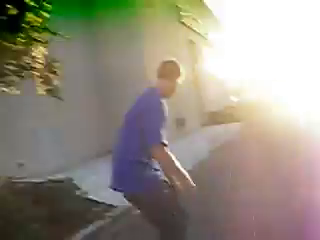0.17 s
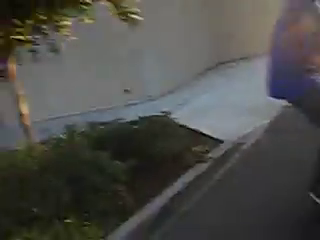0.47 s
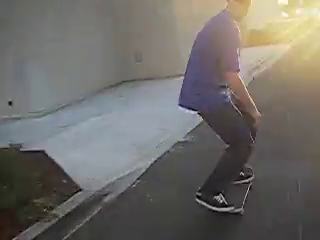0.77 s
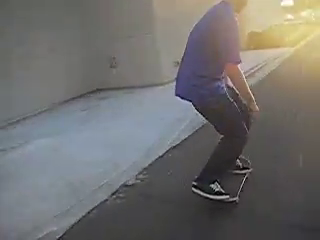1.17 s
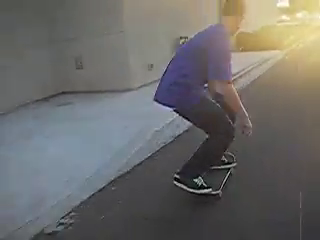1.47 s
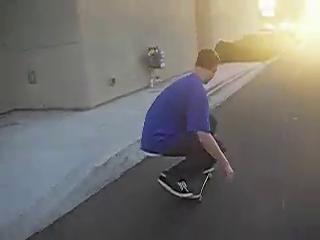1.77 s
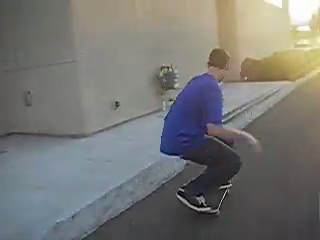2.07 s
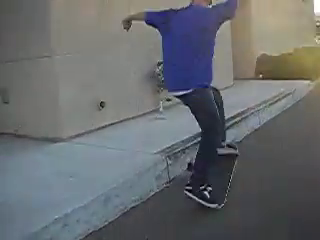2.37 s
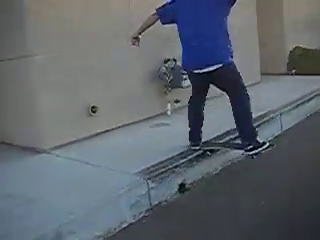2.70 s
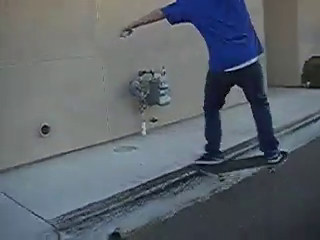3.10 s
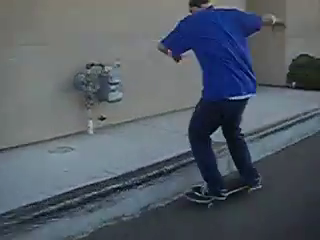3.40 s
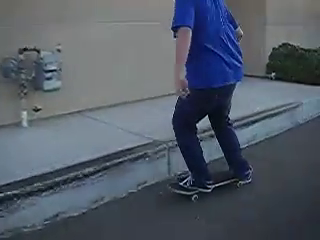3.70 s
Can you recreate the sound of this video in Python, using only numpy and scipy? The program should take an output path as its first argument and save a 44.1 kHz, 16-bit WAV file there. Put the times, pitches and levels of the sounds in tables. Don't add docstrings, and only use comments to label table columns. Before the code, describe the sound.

Skateboard wheels start with uneven metallic clatter, settle into a steady woody rumble, then a pop, a hard metal knock on stone and a landing thud; faint street noise, narrow, distorted small camera sound.

```python
import sys
import numpy as np
from scipy import signal
from scipy.fft import rfft, irfft
from scipy.io import wavfile

SR = 44100
rng = np.random.default_rng(int(sys.argv[2]) if len(sys.argv) > 2 else 0)


def magnitude_from_level(level_db):
    exponent = np.asarray(level_db, float) / 20
    return 10 ** exponent


def store_wav(level_fs):
    pcm = np.round(np.clip(np.atleast_2d(level_fs), -1, 1) * 32767)
    wavfile.write(sys.argv[1], SR, pcm.T.astype(np.int16))


N = 169785


def rms_one(x):
    return x / np.sqrt(np.mean(x ** 2) + 1e-20)


def drift(rate_hz):
    settle = 8000
    r = np.exp(-2 * np.pi * rate_hz / SR)
    wander = signal.lfilter([1], [1, -2 * r, r * r], rng.standard_normal(N + settle))
    return rms_one(wander[settle:])


def resonate(x, hz, width_hz):
    r = np.exp(-np.pi * width_hz / SR)
    gain = (1 - r * r) / 2
    return signal.lfilter([gain, 0, -gain], [1, -2 * r * np.cos(2 * np.pi * hz / SR), r * r], x)


def add(out, start_s, x):
    i = int(start_s * SR)
    out[i:i + len(x)] += x[:N - i]


def grit():
    grains_per_s, spread_db = 900, 3.5
    sizes = magnitude_from_level(spread_db * np.minimum(rng.exponential(1, N), 4)) * rng.choice([-1, 1], N)
    return rms_one(sizes * (rng.random(N) < grains_per_s / SR))


def body(modes, shared_grit, middle_db=0):
    shared, flicker_db, flicker_hz = 0.5, 2, 9.3
    load_damps = 0.3
    total = np.zeros(N)
    for k, (hz, width_hz, db) in enumerate(modes):
        load_share = (k in (0, 2, 3)) - load_damps * (k in (4, 5))
        level = magnitude_from_level(db + flicker_db * drift(flicker_hz) + middle_db * load_share)
        drive = np.sqrt(shared) * shared_grit + np.sqrt(1 - shared) * grit()
        ring = resonate(drive, hz, 1.8 * width_hz)
        ring = resonate(ring, hz, 1.8 * width_hz)
        total += (-1) ** k * level * rms_one(ring) * np.sqrt(width_hz)
    return rms_one(total)


# (time [s], level [dB], truck rattle re deck [dB], load on the middle deck modes [dB])
ROLLING = [(.045, -35.5, -6, -9.5), (.12, -30.5, -11, -11.5), (.23, -20.5, -11.5, -12),
           (.32, -15.5, -8.5, -14), (.42, -18, -13, -13), (.66, -14, -10.5, -10.5), (.88, -10.5, -10, -11),
           (.94, -21.5, -12, -9), (1.06, -12.5, -15.5, -6.5), (1.4, -15.5, -13.5, -5.5),
           (2.35, -13.5, -16.5, -4.5), (2.75, -16, -13.5, -6.5), (2.955, -15, -17.5, -7.5),
           (3.0, -25, -6, -7.5), (3.07, -27.5, -15.5, -7), (3.56, -14.5, -18, -6), (3.66, -23.5, -16, -8),
           (3.85, -22.5, -14.5, -5.5)]
# (frequency [Hz], width [Hz], level [dB])
DECK_MODES = [(228, 101, -7.5), (321.8, 64.5, 0.5), (415.5, 64, -1), (513.5, 88, 2), (662.6, 88.4, 2),
              (794, 130, -4.5), (935, 196, -11)]
# (frequency [Hz], width [Hz], level [dB])
TRUCK_MODES = [(1250, 397, 4.5), (1600, 210, 1.5), (2150, 334, 2), (2800, 1200, -12), (3300, 1500, -6.5),
               (3660, 1500, -26.5)]
# (time [s], depth [dB])
GAIN_DUCKS = [
    (0.901, -1.5),
    (2.781, -8.5),
    (2.992, 0),
    (3.621, -8.5),
]


def rolling():
    recover_s = 0.038
    lump_db, lumps_hz = -0.5, 17
    load_mean_db, load_gain = -6, 1.31
    soft_limit = 0.62
    s, db, rattle_db, weight_db = np.transpose(ROLLING)
    t = np.arange(N) / SR
    shared_grit = grit()
    duck_db = np.zeros(N)
    for at, depth_db in GAIN_DUCKS:
        duck_db += depth_db * (t > at) * np.exp(-np.maximum(t - at, 0) / recover_s)
    load = magnitude_from_level(np.interp(t, s, db) + duck_db + lump_db * drift(lumps_hz))
    middle_db = load_gain * (np.interp(t, s, weight_db) - load_mean_db)
    deck = body(DECK_MODES, shared_grit, middle_db)
    trucks = magnitude_from_level(np.interp(t, s, rattle_db)) * body(TRUCK_MODES, shared_grit)
    return soft_limit * np.tanh(load * (deck + trucks) / soft_limit)


# (frequency [Hz], level [dB])
STREET_SPECTRUM = [(30, -30), (70, -28), (150, -15), (400, -10), (1000, -21.5), (2000, -24.5),
                   (3300, -24.5), (4200, -31.5)]


def street():
    hz, db = np.transpose(STREET_SPECTRUM)
    f = np.fft.rfftfreq(N, 1 / SR) + 1
    shape = magnitude_from_level(np.interp(np.log(f), np.log(hz), db))
    noise = irfft(rfft(rng.standard_normal(N)) * shape, N)
    return magnitude_from_level(-39.5) * rms_one(noise)


def switch_on():
    step, step_end_s = 0.24, 0.0371
    pop, pop_s, pop_width_s = 1.4, 0.0369, 0.00012
    t = np.arange(N) / SR
    return step * (t < step_end_s) + pop * np.exp(-((t - pop_s) / pop_width_s) ** 2)


# (time [s], peak [dB], pitch [Hz], t60 [s])
CAMERA_BUMPS = [(.073, -3, 215, 0.037), (.465, -40, 60, 0.065), (.555, -32.5, 70, 0.076),
                (.74, -25, 90, 0.079), (.95, -32, 80, 0.06), (1.088, -14.5, 96, 0.033),
                (1.343, -11, 60, .03), (2.63, -32.5, 110, 0.21), (2.764, -30.5, 40, 0.077),
                (2.964, -24, 45, 0.13), (3.612, -27, 45, 0.074), (3.837, -29.5, 50, 0.04)]


def bumps():
    out, t = np.zeros(N), np.arange(4000) / SR
    for s, db, hz, t60 in CAMERA_BUMPS:
        envelope = magnitude_from_level(-60 * t / t60) * (1 - np.exp(-t / 0.004))
        add(out, s, magnitude_from_level(db - 1) * np.sin(2 * np.pi * hz * t) * envelope)
    return out


# (time [s], peak [dB], pitch [Hz], t60 [s])
TRUCK_KNOCKS = [(0.0742, -13, 3300, 0.0048), (0.254, -8.5, 1680, 0.014), (0.259, -7, 1630, .02),
                (0.2855, -6.5, 1660, .03), (0.2983, -3, 1679, .03), (.309, -4.5, 1724, 0.041),
                (0.322, -6.5, 1640, .04), (0.337, -8.5, 1600, 0.048), (.379, -10.5, 1744, 0.047),
                (0.4623, -2, 2560, 0.0055), (.4823, -8.5, 2260, .008), (.8685, -10.5, 1600, 0.041),
                (1.849, -12.5, 1920, 0.021), (2.4, -18.5, 1370, 0.013), (2.7715, -4, 2150, 0.034),
                (2.7734, -6.5, 1153, 0.09), (2.9656, 3, 2370, 0.024), (2.981, -35.5, 3300, .02),
                (2.988, 8.5, 3260, 0.0077), (3.017, -16, 3180, 0.045), (3.135, -19.5, 2060, 0.02),
                (3.5933, -7.5, 1367, 0.084), (3.604, -4.5, 2177, 0.036), (3.609, -4, 1250, 0.044),
                (3.616, -6.5, 3300, 0.02), (3.635, -11, 2135, 0.034), (1.36, -14, 2500, 0.014),
                (1.345, -27.5, 3300, .008)]
# (ratio to pitch, level [dB])
KNOCK_PARTIALS = [(.86, -8.5), (1.0, 0.5), (1.1, -5), (1.33, -11.5), (1.55, -9.5), (2.05, -15)]


def knocks():
    scatter_db, attack_s = -9.5, 0.00013
    out, t = np.zeros(N), np.arange(4000) / SR
    for s, db, hz, t60 in TRUCK_KNOCKS:
        level_chance, pitch_chance = rng.standard_normal((2, len(KNOCK_PARTIALS)))
        level_chance[1] = pitch_chance[1] = 0
        ring = np.zeros(len(t))
        for k, (ratio, level_db) in enumerate(KNOCK_PARTIALS):
            partial_hz = hz * ratio * (1 + 0.03 * pitch_chance[k])
            ring += magnitude_from_level(level_db + 2 * level_chance[k]) * np.sin(2 * np.pi * partial_hz * t)
        crack = magnitude_from_level(scatter_db) * 4 * resonate(rng.standard_normal(len(t)), hz, 2000)
        knock = ring * magnitude_from_level(-60 * t / t60) + crack * magnitude_from_level(-60 * t / (1.6 * t60))
        add(out, s, magnitude_from_level(db - 8) * knock * np.minimum(t / attack_s, 1))
    return out


# (time [s], peak [dB], t60 [s])
ROAD_STONES = [(0.13, -15.5, 0.052), (0.383, -11, 0.023), (0.411, -10, 0.05), (0.491, -8, 0.05),
               (0.523, 1.5, 0.035), (0.581, -1.5, 0.027), (0.754, 2, 0.031), (0.799, 3, 0.048),
               (0.826, -9, 0.029), (0.868, -3.5, 0.057), (1.038, -0.5, 0.059), (1.069, -0.5, 0.035),
               (1.169, -1.5, 0.046), (1.26, -9, 0.04), (1.314, -0.5, 0.049), (1.659, 2, 0.014),
               (1.736, 1.5, 0.028), (1.784, 0, 0.03), (2.019, 2, 0.02), (2.254, -1, 0.042),
               (2.337, 9, 0.037), (2.399, -0.5, 0.036), (2.527, -4, 0.028), (2.654, -6.5, 0.03),
               (2.761, 3, 0.038), (2.772, -3, 0.019), (2.961, -4.5, 0.031), (3.529, -3.5, 0.056),
               (3.556, -7.5, 0.071), (3.604, -9.5, 0.12)]


def stones():
    centre_hz, rise_s = 613.5, 0.00079
    trim_db, ceiling_db = -3, -2.6
    out, t = np.zeros(N), np.arange(3000) / SR
    for s, db, t60 in ROAD_STONES:
        chance = rng.standard_normal(7)
        ring = np.zeros(len(t))
        for k, ratio in enumerate((0.8, 1.0, 1.25)):
            hz = centre_hz * ratio * (1 + 0.064 * chance[3 + k])
            ring += magnitude_from_level(2 * chance[k]) * np.sin(2 * np.pi * hz * t)
        ring *= magnitude_from_level(-60 * t / t60) * (1 - np.exp(-t / rise_s))
        peak = magnitude_from_level(min(db + trim_db, ceiling_db))
        add(out, s, ring * np.sign(chance[6]) / np.abs(ring).max() * peak)
    return out


def contact():
    skip_share, skip_s, lead_s = 0.64, 0.0048, 0.00033
    t = np.arange(N) / SR
    touching = np.ones(N)
    for s, *_ in ROAD_STONES:
        touching *= 1 - skip_share * np.exp(-((t - s + lead_s) / skip_s) ** 2)
    return touching


def scene():
    wall_s, wall_db = 0.011, -21.5
    board = contact() * rolling() + stones() + knocks()
    board = signal.sosfilt(signal.butter(3, 130, "high", fs=SR, output="sos"), board)
    lag = int(wall_s * SR)
    echo = magnitude_from_level(wall_db) * np.concatenate([np.zeros(lag), board[:-lag]])
    return (board + echo + street() + bumps())[None]


def top_cut(x):
    return signal.sosfilt(signal.butter(12, 16820, fs=SR, output="sos"), x)


def record(dry):
    edge_hz, stop_hz, hiss_db = 3100, 4620, -83
    start_s, offset, ceiling = 0.0362, -0.037, 0.71
    t = np.arange(N) / SR
    x = dry + magnitude_from_level(hiss_db) * rng.standard_normal(N)
    x = signal.sosfilt(signal.butter(3, edge_hz, fs=SR, output="sos"), x)
    x = signal.sosfilt(signal.cheby2(12, 60, stop_hz, fs=SR, output="sos"), x)
    fade_in = np.clip((t - start_s) / 0.0001, 0, 1)
    x = (x + offset - switch_on()) * fade_in
    mix = np.clip(x, -ceiling, ceiling)
    return top_cut(mix)


dry = scene()
out = record(dry)
store_wav(out)
```